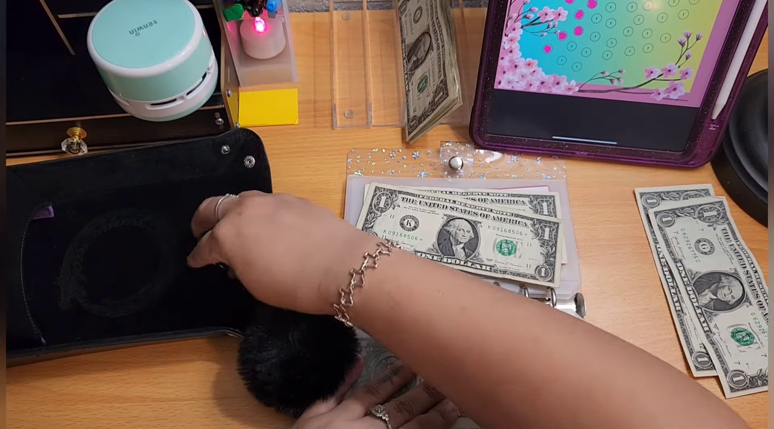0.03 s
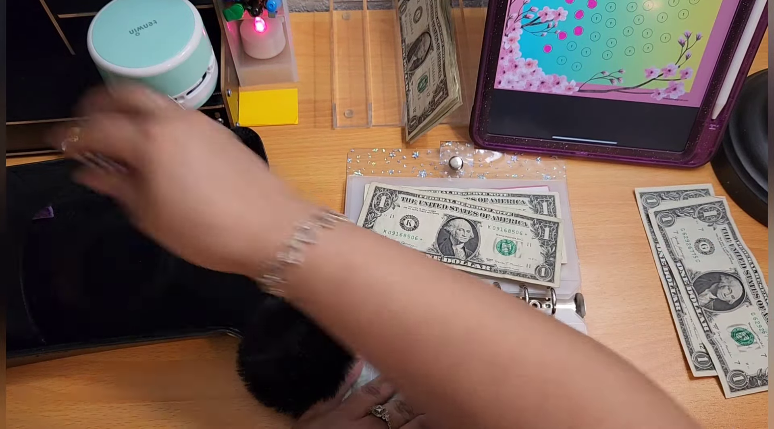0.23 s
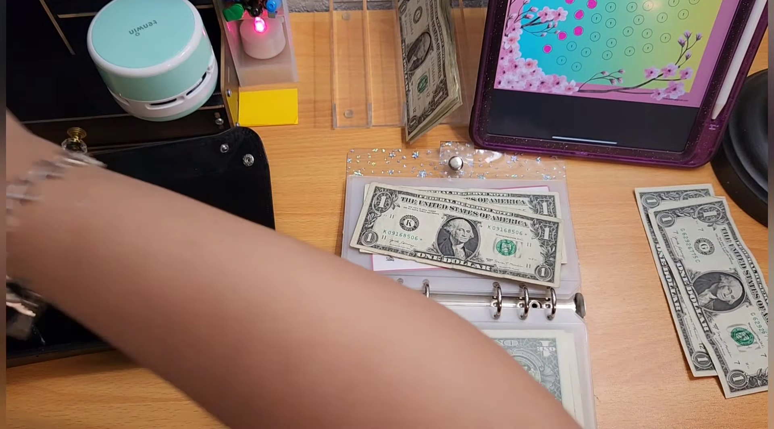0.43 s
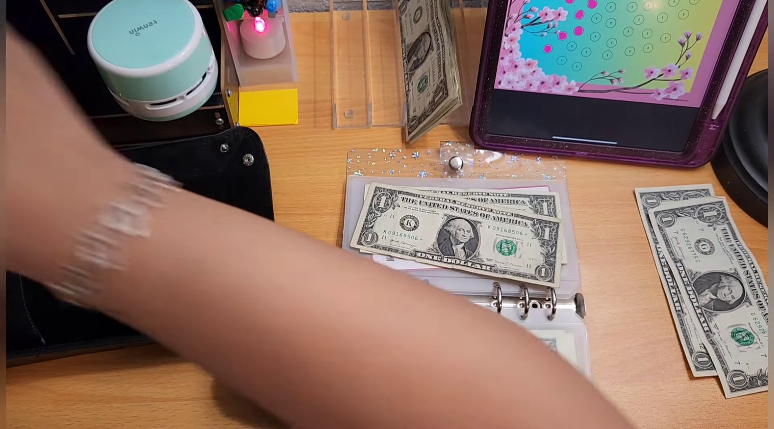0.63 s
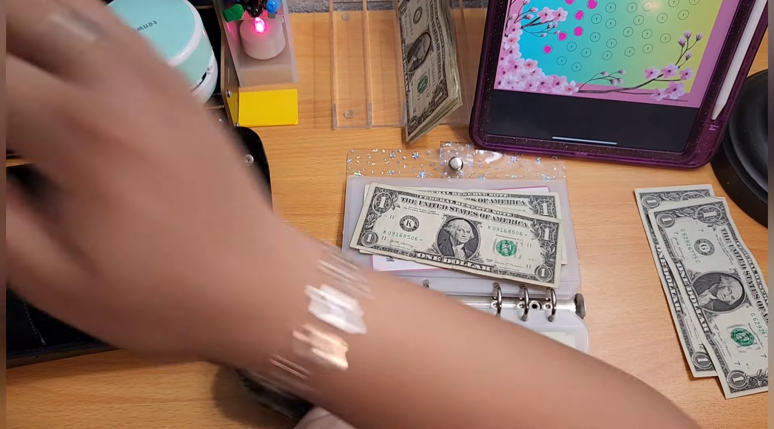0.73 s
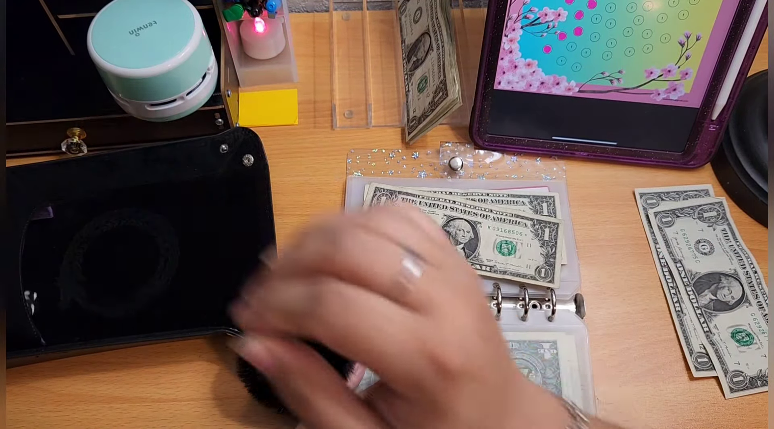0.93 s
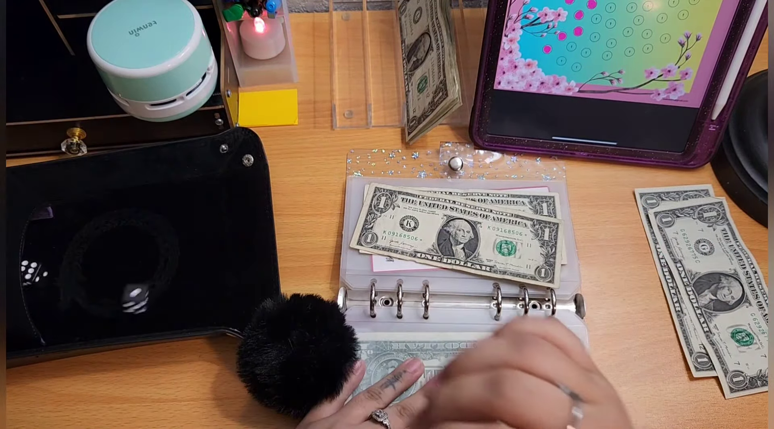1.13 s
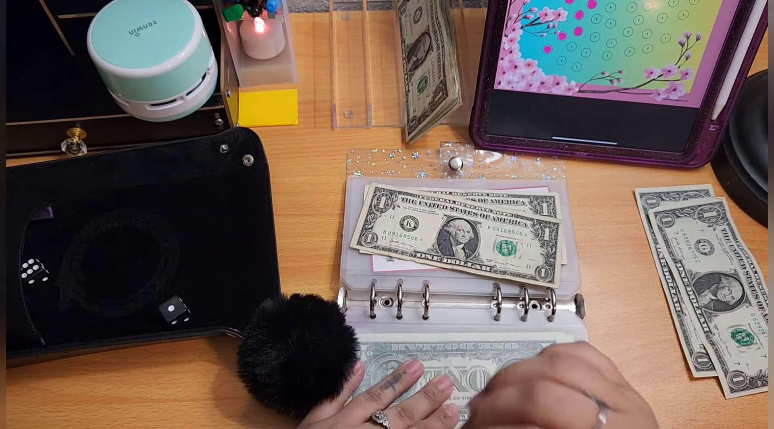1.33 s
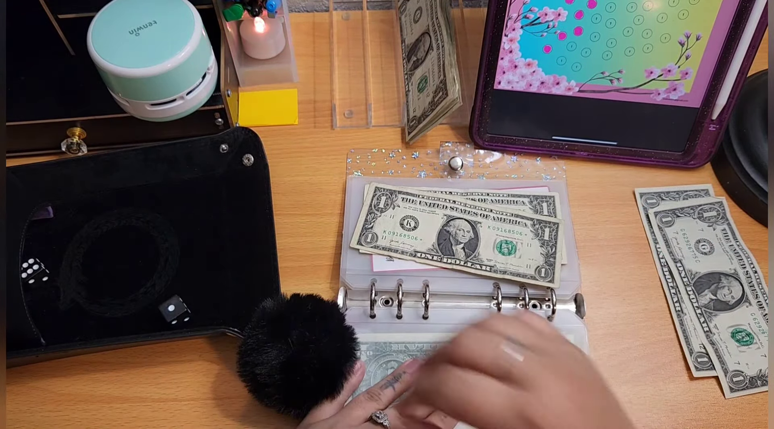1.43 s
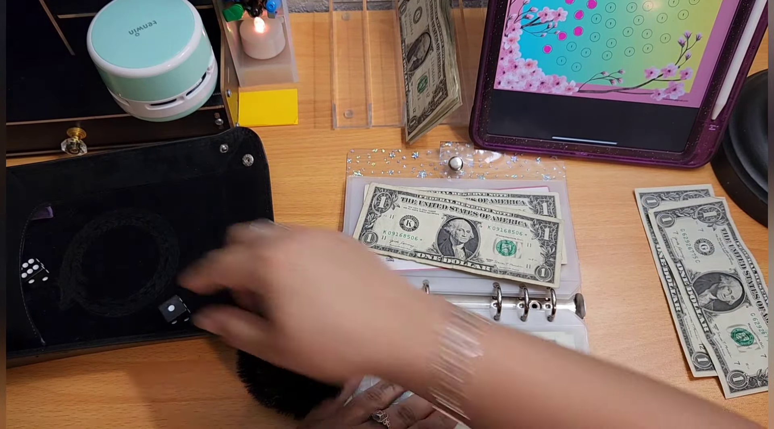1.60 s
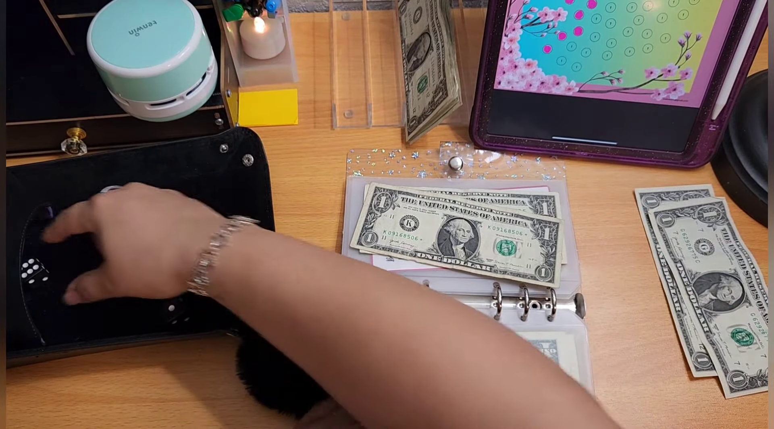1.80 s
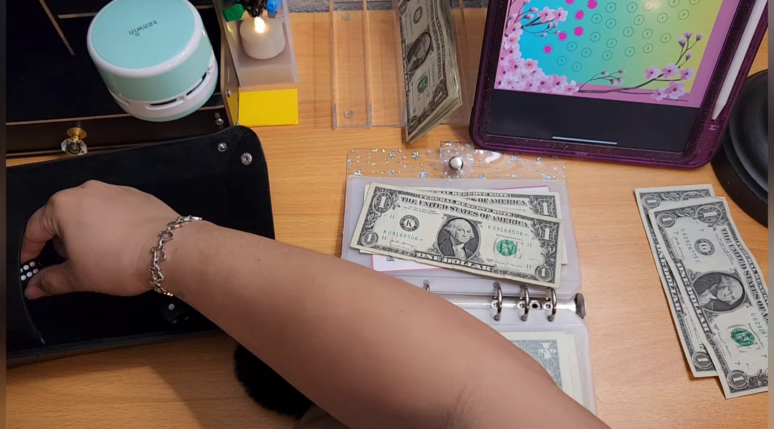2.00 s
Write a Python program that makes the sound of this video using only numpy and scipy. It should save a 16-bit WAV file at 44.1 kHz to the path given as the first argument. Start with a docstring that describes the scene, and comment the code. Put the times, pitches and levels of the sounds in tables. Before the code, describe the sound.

Dice rolled in a padded tray, thudding, bouncing and settling, then a faint jewellery clink

```python
"""A low mains hum, a wavering motor drone and a rumble of ventilation sound throughout, with a faint, changing
rustle of the hand. Bare contacts of two dice give bright clacks: a sharp pulse with a noisy crack and a weak ring.
Thrown into a felt-lined tray on a desk, the dice thud and knock: blows softened by felt excite damped tray modes.
Jewellery then clinks in the hand that picks them up: high damped modes in a splash of filtered noise.
Short desk echoes and the diffuse tail of a small room follow the contacts."""
import sys
import numpy as np
from scipy import signal
from scipy.fft import rfft, irfft
from scipy.io import wavfile

SR = 44100
rng = np.random.default_rng(int(sys.argv[2]) if len(sys.argv) > 2 else 0)


def dump_mix(stems):
    """Bounce the given channels to the path in sys.argv[1] as a 16-bit WAV at rate SR."""
    frames = np.atleast_2d(stems).T  # one column per channel
    limited = np.clip(frames, -1, 1)  # hard clip at full scale
    pcm = np.round(limited * 32767).astype(np.int16)
    wavfile.write(sys.argv[1], SR, pcm)


N = 90493  # samples
HIT_SIZE = 8192  # samples in one contact
MODE_SCATTER_DB = 2.0  # standard deviation of mode strength from contact to contact

# Mains hum lines: f/Hz, rms level/dB before the left-right balance
HUM_LINES = [(59.6, -44.5), (120, -51), (180, -63)]
# Spectral shape of the ventilation rumble: f/Hz, relative density/dB (per Hz)
RUMBLE_SPECTRUM = [(20, -17.5), (30, -9), (45, -5), (70, -5), (100, -7.5), (140, -7), (175, -24),
                   (240, -21), (320, -25.5), (480, -34), (800, -47), (2000, -55), (16000, -88)]
# Spectral shape of the faint hiss: f/Hz, relative density/dB (per Hz)
HISS_SPECTRUM = [(150, -3), (300, -4.5), (600, -18.5), (1200, -20), (2500, -25), (5000, -43), (8000, -44.5),
                 (10000, -55.5), (16000, -62.5)]
# Left-right likeness of diffuse sound: f/Hz, correlation (1 = identical, 0 = unrelated)
STEREO_LIKENESS = [(60, 1), (250, 0.91), (600, 0.54), (1200, 0.16), (2500, 0), (16000, 0.0)]
MOTOR_HZ, MOTOR_DB, MOTOR_WIDTH_HZ = 83.4, -43.5, 4.4  # width of each of two resonators
RUMBLE_DB, HISS_DB = -45, -62.5
BACKGROUND_BALANCE_DB = .45  # left up, right down

# Skin and bracelet brush as the hand moves: t/s, level/dB
BRUSH_LEVEL = [(0, -59.5), (.06, -55), (.17, -65.5), (.23, -83.5), (.42, -77.5), (.58, -76.5), (.9, -74.5),
               (1.25, -73), (1.39, -75.5), (1.52, -90), (1.76, -84.5), (1.915, -73), (1.945, -45.5),
               (1.98, -69), (2.05, -72)]
# Spectral shape of the brushing: f/Hz, relative density/dB (per Hz)
BRUSH_SPECTRUM = [(300, -10), (1000, -3), (2500, 0.5), (4500, 2), (8000, -3.5), (11000, -15),
                  (16000, -10.5)]
BRUSH_GRAINS_PER_S, BRUSH_GRAIN_DB = 250, 2.5

# A die strikes the other die or the bare rim: t/s, level/dB, contact bandwidth f/Hz
CLACK_CONTACTS = [(0.0317, -37, 18000), (0.0375, -38.5, 16000), (0.0415, -43, 12000), (0.0857, -50.5, 7700),
                  (0.195, -72, 15000), (0.6269, -39.5, 9600), (0.6295, -35, 9000), (0.635, -39.5, 9700),
                  (0.6604, -39.5, 2420), (0.933, -63.5, 2080), (0.9379, -64, 3500), (0.9934, -42.5, 2520),
                  (0.9972, -55.5, 13600), (1.0964, -28, 9400), (1.218, -69.5, 3040), (1.657, -72, 2280),
                  (1.911, -63, 3200), (1.9445, -60, 2580), (1.9615, -56, 2380), (2.0158, -53.5, 3300)]
# A die chatters and strikes twice: t/s, delay of the second contact t/s, its relative level/dB
CLACK_REBOUNDS = [(1.0964, .00215, -2)]
# Spectrum of a bare contact: f/Hz, relative level/dB
CLACK_SPECTRUM = [(300, -27.5), (1200, -26.5), (2200, -12), (2800, -5.5), (3400, -1), (4700, 4.5),
                  (6200, -5), (7800, -6), (9200, -9), (11500, -6.5), (13500, -16), (16000, -20.5)]
CRACK_DB, CRACK_T60_S = -8, .003
CLACK_RING_DB, CLACK_RING_T60_S = -29, 0.069

# Echoes from things on the desk: delay t/s, level/dB relative to the direct sound
DESK_REFLECTIONS = [(.0034, -33), (.0078, -32.5)]
# Reverberation time of the room by band: f/Hz, t60/s
ROOM_DECAY = [(150, 0.83), (600, 0.37), (2000, 0.2), (5000, 0.2), (9000, 0.17), (15000, 0.053)]
# Spectrum of the room tail: f/Hz, level/dB relative to the direct sound
ROOM_SPECTRUM = [(100, -8.5), (300, -7), (600, -13.5), (1200, -6), (2500, -7.5), (5000, -9), (9000, -1.5),
                 (15000, 2)]
ROOM_BUILD_S = 0.0019
BRIGHT_PAN_DB, BRIGHT_LAG_S = 2.3, .00013  # left up, right down; right channel late
KNOCK_PAN_DB, KNOCK_LAG_S = 1.5, .00018

# A die hits the tray; rows close in time layer the low and bright parts of a landing and its early echoes:
# t/s, level/dB, contact bandwidth f/Hz, pitch favoured by the struck spot f/Hz, its boost/dB,
# thump strength/dB relative to THUMP_DB
TRAY_KNOCKS = [(0.6239, -16, 680, 580, 14.5, 0.5), (0.6262, -23, 1272, 970, 14.5, -4.5),
               (0.6253, -30, 3230, 2300, 11, -4.5), (0.6269, -33, 1700, 1420, 17.5, -3.5),
               (0.6323, -23.5, 450, 296, 7, 8.5), (0.633, -35.5, 2700, 2400, 14.5, -0.5),
               (0.659, -20.5, 2300, 930, 9, 3.5), (0.6595, -27, 3500, 2330, 13, -2.5),
               (0.6598, -32.5, 3645, 3100, 19.5, -10.5), (0.6645, -29.5, 900, 606, 4, 3.5),
               (0.672, -30, 1000, 320, 2, -3), (0.6754, -32.5, 600, 346, 10.5, 2.5),
               (0.777, -47.5, 700, 650, -2.5, -7.5), (0.802, -34.5, 990, 860, 8.5, 7),
               (0.852, -50.5, 800, 700, 2.5, 6.5), (0.8775, -36, 640, 540, 9, -9),
               (0.9036, -48, 913, 650, 3, -12.5), (0.928, -31.5, 1170, 657, 11.5, -5.5),
               (0.9297, -51, 2500, 2000, 14, -5.5), (0.937, -52.5, 2802, 1900, 8.5, 1.5),
               (0.9678, -32, 750, 614, 19.5, -4.5), (0.9921, -17.5, 1480, 1250, 7.5, 7.5),
               (0.9925, -33, 2200, 1890, 12, -8.5), (0.9944, -31.5, 750, 326, -3, 6.5),
               (1.0003, -25, 1400, 740, 3, -9), (1.0125, -35.5, 950, 750, 7, 1),
               (1.0153, -37, 1550, 1330, 9.5, -2), (1.0217, -35, 1550, 1290, 7.5, -1.5),
               (1.041, -28.5, 840, 585, 6, -3.5), (1.053, -38, 1550, 1360, 2.5, 16.5),
               (1.097, -32.5, 1300, 295, 14.5, 4), (1.109, -29.5, 913, 296, 7.5, 16.5),
               (1.14, -43.5, 890, 690, 0, 7.5), (1.167, -39, 558, 390, 1.5, 18),
               (1.216, -40.5, 620, 550, 3.5, 4.5), (1.218, -50.5, 1400, 1248, 17, -1),
               (1.962, -61, 2210, 1250, 22, -3), (2.0144, -52.5, 2200, 1570, 14, -4)]
# Modes of the padded tray: f/Hz, mean relative strength/dB, t60/s
TRAY_MODES = [(297.5, -5, 0.029), (444.3, -6.5, 0.041), (545.4, 0, 0.019), (737, -6, 0.025),
              (850, -5, 0.024), (1060, -4, 0.018), (1188, -5.5, 0.013), (1443, -4.5, 0.022),
              (1726, -6, 0.016), (1832, -5.5, 0.025), (2180, -0.5, 0.016), (2700, -9, 0.01),
              (3000, -4, 0.007)]
THUMP_HZ, THUMP_DB, THUMP_T60_S = 131.5, -11.5, 0.044  # low ring of the room that each knock sets off
SPOT_WIDTH = .35  # favoured region as a share of its pitch
CONTACT_LEAK_DB = -49  # part of a blow that the felt does not filter

# Jewellery touches a die as the hand closes on it: t/s, level/dB before CLINK_DB is added
CLINK_TOUCHES = [(1.85, -73.5), (1.9341, -40), (1.9352, -34), (1.9377, -35), (1.9385, -43.5), (1.9465, -56),
                 (1.955, -46), (1.961, -54)]
# Modes that those touches ring: f/Hz, mean relative strength/dB, t60/s
CLINK_RESONANCES = [(3030, -5, 0.01), (4260, 3.5, 0.0081), (4890, -0.5, 0.016), (5230, -16.5, 0.0061),
                    (5840, -3.5, 0.013), (7730, -2, 0.0049), (8220, -1, 0.01), (8710, -5, 0.012),
                    (9670, -7, .01), (10600, -6.5, 0.0096), (11700, -4.5, 0.0069), (13600, -13, 0.00483),
                    (14670, -13.5, .006)]
CLINK_DB = -1
CLINK_SPLASH_DB, CLINK_SPLASH_T60_S = -8, 0.015

CUTOFF_HZ = 16200


def from_db(db):
    """Amplitude ratio: a factor of ten for every 20 dB."""
    return 10 ** (np.asarray(db) / 20)


def rms_one(x):
    """Normalisation to unit root mean square."""
    return x / np.sqrt(np.mean(x ** 2) + 1e-20)


def at_hz(points, hz):
    """Linear interpolation of a table over log frequency."""
    f, v = np.transpose(points)
    return np.interp(np.log(np.maximum(hz, 1)), np.log(f), v)


def lowpass(x, hz, order=2):
    """Butterworth low-pass: a longer contact excites less treble."""
    sos = signal.butter(order, min(hz, SR / 2 - 1000), fs=SR, output="sos")
    return signal.sosfilt(sos, x)


def resonance(x, hz, width_hz):
    """Two-pole resonator: a band-pass with gain near 1 at its peak."""
    r = np.exp(-np.pi * width_hz / SR)
    zeros = np.array([1, 0, -1]) * (1 - r * r) / 2
    poles = [1, -2 * r * np.cos(2 * np.pi * hz / SR), r * r]
    return signal.lfilter(zeros, poles, x)


def dying(t, t60):
    """Exponential damping: a fall of 60 dB in t60."""
    return np.exp(-np.log(1000) * t / t60)


def add(track, s, db, hit):
    """Energy scaling: the level is the energy of the hit spread over a hundredth of a second."""
    i = int(s * SR)
    hit = hit * from_db(db) / np.sqrt(np.sum(hit ** 2) * 100 / SR)
    track[i:i + len(hit)] += hit[:N - i]


def causal_response(colour):
    """Minimum phase: folding the cepstrum gives the most compact causal pulse with this spectrum."""
    hz = np.fft.rfftfreq(HIT_SIZE, 1 / SR)
    cepstrum = irfft(np.log(from_db(at_hz(colour, hz))))
    cepstrum[1:HIT_SIZE // 2] *= 2
    cepstrum[HIT_SIZE // 2 + 1:] = 0
    return irfft(np.exp(rfft(cepstrum)))


def diffuse_noise(colour, size):
    """Diffuse field: two channels of noise, alike in the bass and unrelated in the treble."""
    hz = np.fft.rfftfreq(size, 1 / SR)
    mid, side = rfft(rng.standard_normal((2, size)))
    alike = np.clip(at_hz(STEREO_LIKENESS, hz), -1, 1)
    common = np.sqrt((1 + alike) / 2) * mid
    opposed = np.sqrt((1 - alike) / 2) * side * [[1], [-1]]
    return irfft((common + opposed) * from_db(at_hz(colour, hz)), size)


def background():
    """Steady sources: mains sinusoids, narrow-band noise as a wavering motor drone, and shaped noise."""
    t = np.arange(N) / SR
    hum = 0
    for hz, db in HUM_LINES:
        phase = rng.random()  # cycles
        hum = hum + from_db(db) * np.sqrt(2) * np.sin(2 * np.pi * (hz * t + phase))
    drone = rng.standard_normal(N + SR)
    for _ in range(2):
        drone = resonance(drone, MOTOR_HZ, MOTOR_WIDTH_HZ)
    drone = from_db(MOTOR_DB) * rms_one(drone[SR:])  # the resonators have settled
    rumble = from_db(RUMBLE_DB) * rms_one(diffuse_noise(RUMBLE_SPECTRUM, N))
    hiss = from_db(HISS_DB) * rms_one(diffuse_noise(HISS_SPECTRUM, N))
    balance = from_db([[BACKGROUND_BALANCE_DB], [-BACKGROUND_BALANCE_DB]])
    return (hum + drone + rumble + hiss) * balance


def brush():
    """Friction noise: random grains modulate a faint rustle whose level follows the hand."""
    t = np.arange(N) / SR
    grain = np.interp(t * BRUSH_GRAINS_PER_S, np.arange(N), rng.standard_normal(N))
    level_db = np.interp(t, *np.transpose(BRUSH_LEVEL))
    rustle = diffuse_noise(BRUSH_SPECTRUM, N) * from_db(BRUSH_GRAIN_DB * grain)
    return from_db(level_db) * rms_one(rustle)


def clacks():
    """Hard impact: a sharp pulse with a brief crack and a weak dense ring; a rebound repeats it at once."""
    out, t = np.zeros(N), np.arange(HIT_SIZE) / SR
    pulse = causal_response(CLACK_SPECTRUM)
    crack = from_db(CRACK_DB) * dying(t, CRACK_T60_S)
    ring = from_db(CLACK_RING_DB) * dying(t, CLACK_RING_T60_S)
    for s, db, contact_hz in CLACK_CONTACTS:
        noise = (crack + ring) * rng.standard_normal(HIT_SIZE)
        noise = signal.fftconvolve(noise, pulse)[:HIT_SIZE]
        hit = lowpass(pulse + noise, contact_hz, order=3)
        for at_s, delay_s, rebound_db in CLACK_REBOUNDS:
            if abs(s - at_s) < 2 * delay_s:
                hit = hit + from_db(rebound_db) * np.roll(hit, round(delay_s * SR))
        add(out, s, db, hit)
    return out


def from_the_left(x, pan_db, lag_s):
    """Interaural cues: direct sound and desk echoes are earlier and louder in the left channel."""
    echoes = sum(from_db(db) * np.roll(x, round(s * SR)) for s, db in DESK_REFLECTIONS)
    x = x + echoes
    left = x * from_db(pan_db)
    right = np.roll(x, round(lag_s * SR)) * from_db(-pan_db)
    return np.array([left, right])


def room(x):
    """Reverberation: a diffuse tail builds up quickly and dies band by band."""
    size = SR // 2
    t, hz = np.arange(size) / SR, np.fft.rfftfreq(size, 1 / SR)
    noise, tail = rfft(diffuse_noise(ROOM_SPECTRUM, size)), 0
    centres = [f for f, _ in ROOM_DECAY]
    build_up = 1 - np.exp(-(t / ROOM_BUILD_S) ** 2)
    for share, (_, t60) in zip(np.eye(len(centres)), ROOM_DECAY):
        envelope = dying(t, t60) * build_up
        weight = at_hz(list(zip(centres, share)), hz)  # neighbouring bands crossfade
        band = irfft(noise * weight, size)
        tail = tail + band * envelope / np.sqrt(np.sum(envelope ** 2))
    return signal.fftconvolve(x[None], tail, axes=1)[:, :N]


def knocks():
    """Modal excitation: a felt-softened blow rings the tray, and the struck spot favours one region."""
    out, t = np.zeros(N), np.arange(HIT_SIZE) / SR
    hz, mode_db, t60 = np.transpose(TRAY_MODES)[:, :, None]
    signs = (-1) ** np.arange(len(TRAY_MODES))[:, None]  # neighbours swing in opposite senses
    modes = signs * np.sin(2 * np.pi * hz * t) * dying(t, t60)
    thump = np.sin(2 * np.pi * THUMP_HZ * t) * dying(t, THUMP_T60_S)
    for s, db, contact_hz, spot_hz, spot_db, thump_db in TRAY_KNOCKS:
        strengths = from_db(mode_db + MODE_SCATTER_DB * rng.standard_normal(hz.shape))
        body = (modes * strengths).sum(0)
        body = body + from_db(THUMP_DB + thump_db) * thump
        spot = resonance(body, spot_hz, spot_hz * SPOT_WIDTH)
        body = body + (from_db(spot_db) - 1) * spot
        softened = lowpass(body, contact_hz, order=5)
        add(out, s, db, -(softened + from_db(CONTACT_LEAK_DB) * body))
    return out


def clinks():
    """Damped resonance: each touch of jewellery and die gives modes new strengths, in a splash of noise."""
    out, t = np.zeros(N), np.arange(HIT_SIZE) / SR
    hz, mode_db, t60 = np.transpose(CLINK_RESONANCES)[:, :, None]
    modes = np.cos(2 * np.pi * hz * t) * dying(t, t60)
    edges = [hz.min(), min(hz.max(), SR / 2 - 1000)]
    splash_band = signal.butter(2, edges, "band", fs=SR, output="sos")
    for s, db in CLINK_TOUCHES:
        strengths = from_db(mode_db + MODE_SCATTER_DB * rng.standard_normal(hz.shape))
        strengths = strengths * rng.choice([-1, 1], hz.shape)
        splash = rng.standard_normal(HIT_SIZE) * dying(t, CLINK_SPLASH_T60_S)
        splash = signal.sosfilt(splash_band, splash)
        hit = (strengths * modes).sum(0) + from_db(CLINK_SPLASH_DB) * splash
        add(out, s, db + CLINK_DB, hit)
    return out


def scene():
    """Superposition: dice to the left, the room's response to them, the hand and the background add linearly."""
    dull = knocks()
    bright = clacks() + clinks()
    direct = from_the_left(dull, KNOCK_PAN_DB, KNOCK_LAG_S)
    direct = direct + from_the_left(bright, BRIGHT_PAN_DB, BRIGHT_LAG_S)
    return direct + room(dull + bright) + brush() + background()


def record(dry):
    """Band limitation: a steep elliptic low-pass, run both ways for zero phase, cuts the top."""
    sos = signal.ellip(10, .05, 60, CUTOFF_HZ, fs=SR, output="sos")
    return signal.sosfiltfilt(sos, dry)


dry = scene()
out = record(dry)
dump_mix(out)
```